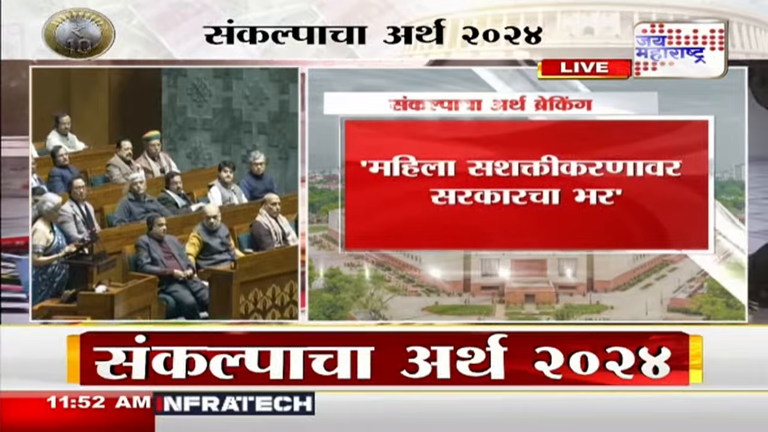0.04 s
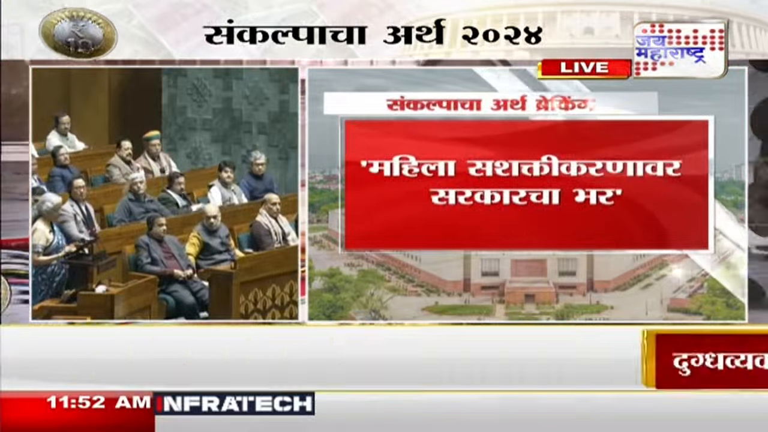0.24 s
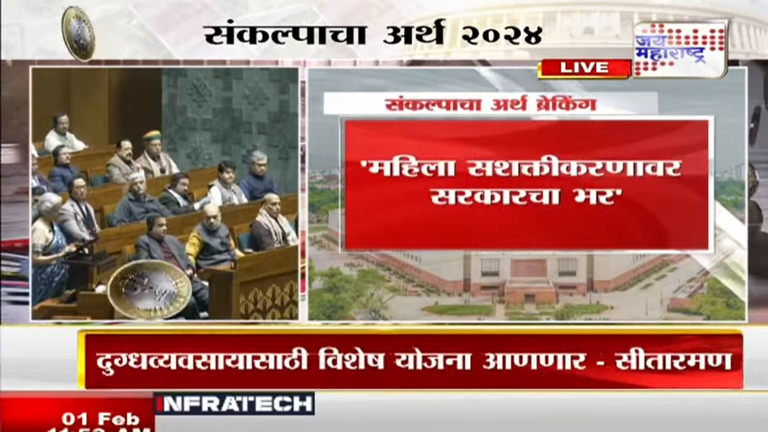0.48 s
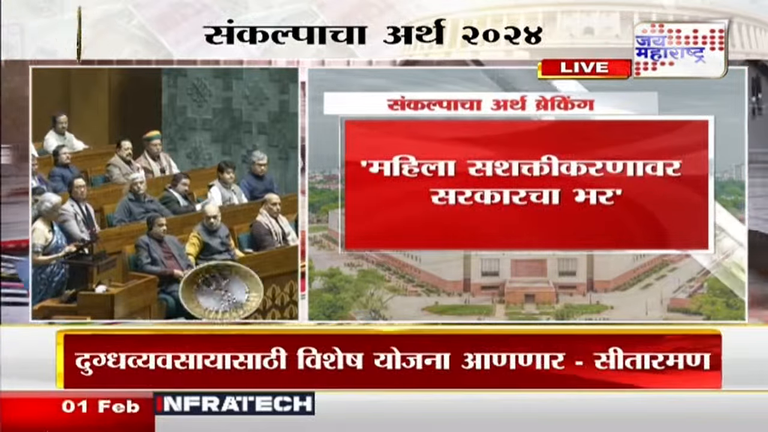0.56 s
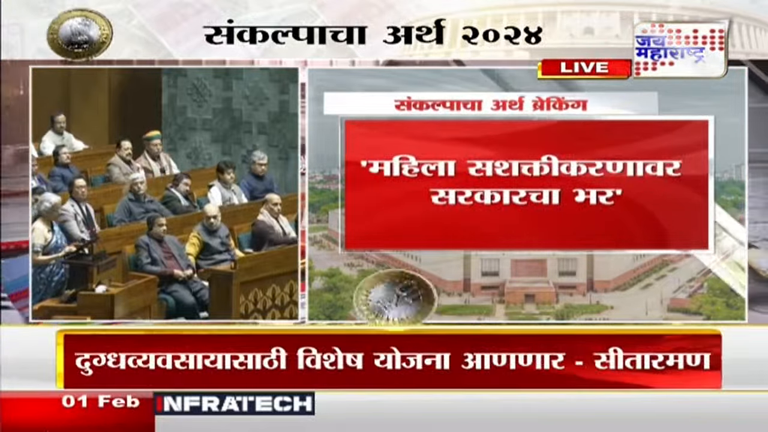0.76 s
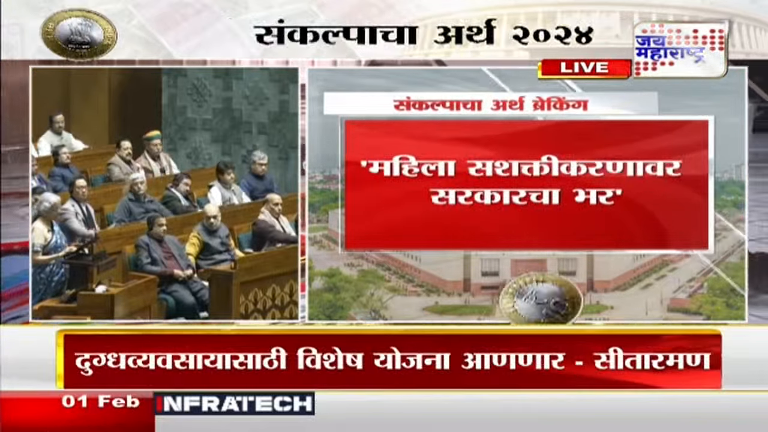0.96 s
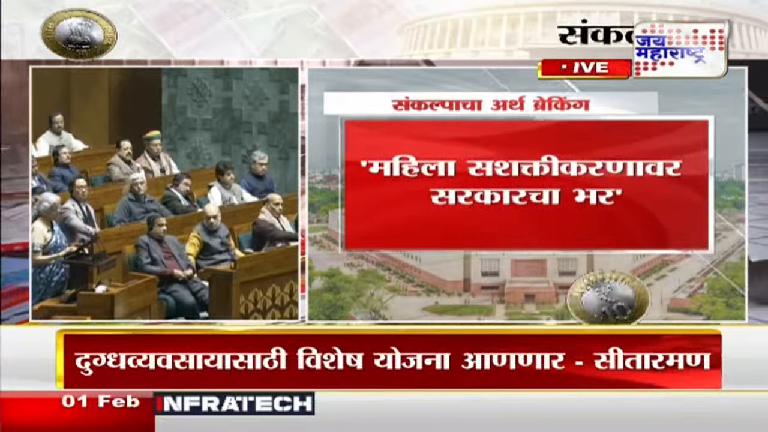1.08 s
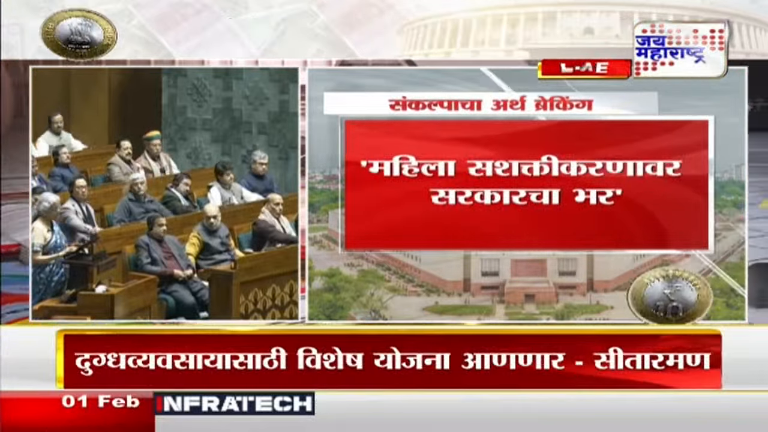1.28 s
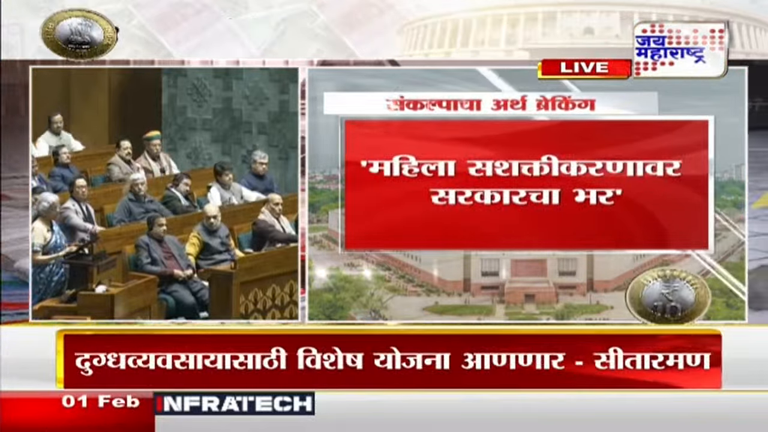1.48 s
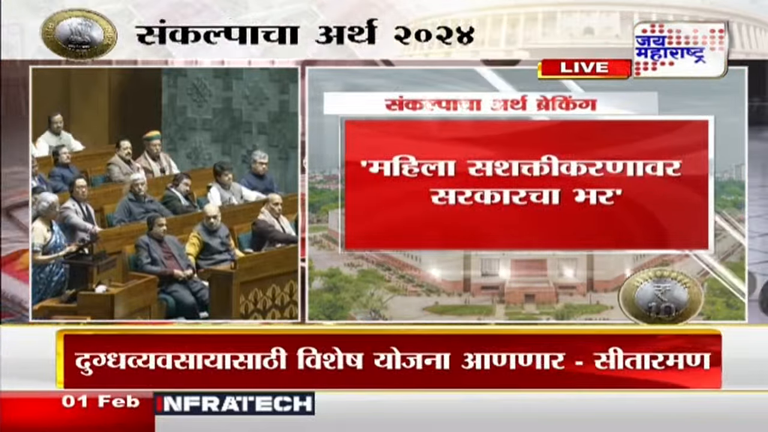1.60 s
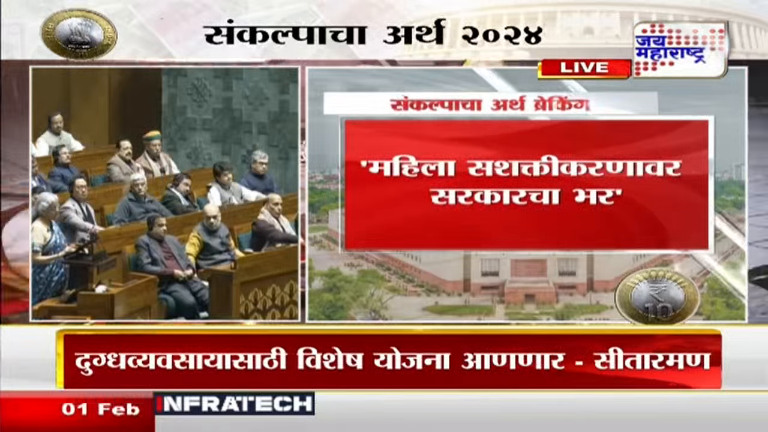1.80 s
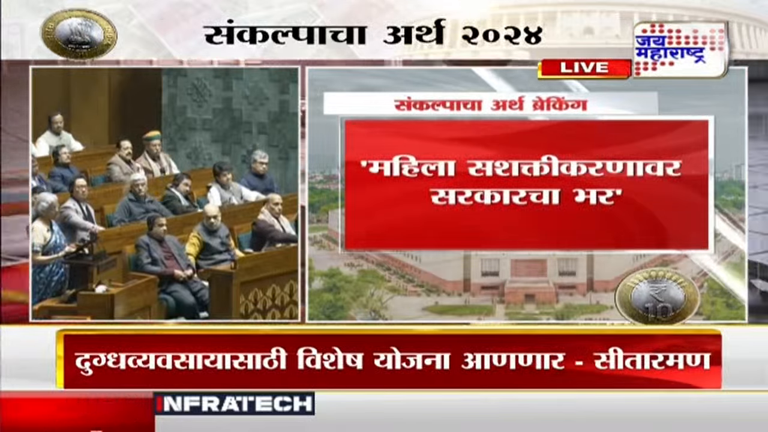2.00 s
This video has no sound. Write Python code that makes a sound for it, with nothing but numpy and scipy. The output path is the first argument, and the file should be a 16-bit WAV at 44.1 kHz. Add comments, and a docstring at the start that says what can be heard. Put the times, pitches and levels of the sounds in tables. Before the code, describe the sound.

Desk-thumping by a seated crowd in an assembly hall, dull booms, slaps and sharp wooden cracks

```python
"""Many hands thump wooden desks in a large assembly hall, a dense patter that swells.
Each crowd blow is a dull desk boom (fading sines) plus a slap of skin (a filtered burst of noise).
An echo made of fading noise blurs the far blows; light finger taps tick throughout.
Nearer slaps, some with ringing tones, and knocks stand out; twice something hard cracks on wood close by.
The level dips briefly once, and the microphone thins the deepest bass and the top."""
import sys
import numpy as np
from scipy import signal
from scipy.fft import rfft, irfft, next_fast_len
from scipy.io import wavfile
from scipy.ndimage import uniform_filter1d, map_coordinates

SR = 44100
rng = np.random.default_rng(int(sys.argv[2]) if len(sys.argv) > 2 else 0)


def wrap_up_sound(samples):
    """Save the sound to the file named by the first command line argument, as 16-bit audio."""
    columns = np.atleast_2d(samples).T
    # keep every value between -1 and 1, then stretch to whole-number steps
    tamed = np.clip(columns, -1, 1)
    steps = np.round(tamed * 32767).astype(np.int16)
    wavfile.write(sys.argv[1], SR, steps)


N = 90272  # length in samples, about two seconds
T = np.arange(SR // 4) / SR  # a quarter second of time, in seconds
# Throughout, t60 is the time in seconds a sound takes to fade by 60 dB.

# How loud the far slaps are over time. Each row: time in seconds, level in dB.
PATTER_LEVEL = [(0, -59.5), (.05, -56), (.14, -49.5), (.3, -50.5), (.43, -51), (.54, -54), (.64, -48.5),
                (.83, -48), (.93, -48.5), (1.05, -47.5), (1.18, -46), (1.27, -46.5), (1.39, -48),
                (1.52, -43.5), (1.66, -44), (1.78, -46), (1.92, -47), (2.04, -46)]


def amp(db):
    """Turn decibels into a gain."""
    return 10 ** (np.asarray(db) / 20)


def unit(x):
    """Scale to an average (rms) level of 1."""
    return x / np.sqrt(np.mean(x ** 2) + 1e-20)


def fade(t60, t=T):
    """Die away exponentially, as a struck thing loses its energy."""
    return np.exp(-np.log(1000) * t / t60)


def attack(rise_s, t=T):
    """Start softly: a gain that climbs from 0 towards 1."""
    return 1 - np.exp(-t / rise_s)


def along(points, hz):
    """Read a curve of (Hz, value) points, spaced by pitch (log frequency)."""
    point_hz, values = np.transpose(points)
    return np.interp(np.log(hz + 1), np.log(point_hz + 1), values)


def level(rows):
    """Turn a (seconds, dB) curve into one gain per sample."""
    return amp(np.interp(np.arange(N) / SR, *np.transpose(rows)))


def filtered(x, response):
    """Multiply each frequency of x by response(Hz)."""
    m = next_fast_len(2 * len(x))
    hz = np.fft.rfftfreq(m, 1 / SR)
    return irfft(rfft(x, m) * response(hz), m)[:len(x)]


def add(track, s, sound):
    """Mix a sound into the track at s seconds, cut off at the track's end."""
    i = max(round(s * SR), 0)
    part = track[i:i + len(sound)]
    part += sound[:len(part)]


def in_hall(x, wet):
    """Blend in the hall's echo, whose treble dies first; wet is its share of the power."""
    # How long the hall rings. Each row: frequency in Hz, t60 in seconds.
    hall_fade = [(100, 1.22), (1000, .9), (4000, 0.53), (12000, 0.31)]
    echo = np.zeros(len(x))
    # A fresh random echo every quarter second, so no single echo's tones stand out.
    for i in range(0, len(x), len(T)):
        hz, t, z = signal.stft(rng.standard_normal(SR), SR, nperseg=256)
        fading = z * fade(along(hall_fade, hz)[:, None], t)
        tail = signal.istft(fading, SR, nperseg=256)[1]
        tail = tail / np.linalg.norm(tail)
        add(echo, i / SR, signal.fftconvolve(x[i:i + len(T)], tail))
    wet = np.clip(wet, 0, 1)
    return np.sqrt(1 - wet) * x + np.sqrt(wet) * echo


def voiced(x, colour):
    """Flatten a layer's spectrum, give it a long-term colour, then hold its level steady at 1."""
    spectrum = rfft(x)
    power = abs(spectrum) ** 2
    smooth = abs(uniform_filter1d(power, size=150)) + 1e-9 * power.mean()
    tint = amp(along(colour, np.fft.rfftfreq(len(x), 1 / SR)))
    y = irfft(spectrum / np.sqrt(smooth) * tint, len(x))
    running_power = abs(uniform_filter1d(y ** 2, size=6000))
    return (y / np.sqrt(running_power + 1e-20))[-N:]


def wander(position):
    """Read a smooth random curve, with one random knot per unit of position, kept within -1 to 1."""
    knots = rng.standard_normal(size=64)
    return np.tanh(map_coordinates(knots, [position], mode="mirror"))


def grainy(count):
    """Flutter the gain as fingers and palm land one after another."""
    GRAIN_DB, GRAINS_PER_S = 5.5, 470
    return amp(GRAIN_DB * wander(np.arange(count) * GRAINS_PER_S / SR))


def slap(hz, octaves, t60):
    """Skin on wood: a short noise burst through one broad, uneven resonance."""
    RISE_S, SKIRT = 0.00076, 1.1  # a larger skirt falls off faster around the centre
    RIPPLE_DB, RIPPLE_HZ = 2.5, 675  # depth and spacing of each slap's own peaks and hollows
    t = T[:2048]
    shape = fade(t60, t) * attack(RISE_S, t) * grainy(len(t))

    def resonance(f):
        """One broad hump around hz, roughened by the ripple."""
        distance = np.log2((f + 1) / hz) / octaves
        return amp(RIPPLE_DB * wander(f / RIPPLE_HZ)) * (1 + distance ** 2) ** -SKIRT

    burst = filtered(rng.standard_normal(len(t)) * shape, resonance)
    return unit(burst) * np.sqrt(np.mean(fade(t60, t) ** 2))


def crowd():
    """Each hand beats its own desk at its own pace, waking its tones differently at every blow."""
    # The crowd's effort. Each row: time in seconds, level of the booms in dB.
    boom_level = [(0, -41.5), (.05, -51), (.14, -46), (.3, -48.5), (.42, -47), (.5, -45.5), (.64, -43.5),
                  (.8, -41.5), (.89, -43), (.96, -48.5), (1.08, -42.5), (1.2, -40), (1.37, -45),
                  (1.52, -38), (1.68, -41.5), (1.78, -41.5), (1.94, -41.5), (2.03, -45.5)]
    # Each row: time in seconds, gain of the deep bass against the other booms in dB.
    deep_level = [(0, 0), (.42, -0.5), (.52, 5.5), (.73, 2.5), (.82, -5), (.96, 5), (1.2, -3.5), (1.4, 0.5),
                  (1.7, 0.5), (2.04, 3)]
    # A middling desk top, before colouring. Each row: frequency in Hz, typical level in dB, t60 in seconds.
    desk_modes = [(78.4, 0.5, 0.063), (122, -2, 0.084), (196.7, 1.5, 0.045), (273.6, -0.5, 0.054),
                  (401.2, -3.5, 0.041), (542, -11.5, 0.027), (858, -13.5, 0.024)]
    # Long-term colours. Each row: frequency in Hz, relative level in dB per Hz.
    boom_colour = [(25, -7), (42, -18.5), (65, -7), (100, -6), (135, -3.5), (185, -1), (260, -3),
                   (400, -2.5), (560, -11), (800, -12.5), (1300, -43), (3000, -59)]
    patter_colour = [(200, -9), (500, 3), (850, 3.5), (1300, 4), (2200, 0), (3500, -1.5), (5500, -7),
                     (7000, -7), (9000, -10.5), (11000, -13.5), (13500, -14.5), (16000, -27)]
    HANDS, BLOWS_PER_S, TIMING_S = 38, 4.2, .025  # typical pace; timing scatter
    NEARNESS_DB, FORCE_DB = 2, 2  # scatter between hands, and between blows
    SLAP_HZ, SLAP_SCATTER_OCT, SLAP_T60_S, SLAP_SPREAD_DB = 4300, 0.69, 0.016, 13
    BOOM_WET, PATTER_WET = 0.46, 0.71  # the hall's share of the power
    DEEP_HZ = 115  # the deep bass lies below about this
    WASH_DB = -4.5  # the farthest slaps, fused into a hiss, against the nearer patter

    booms, slaps = np.zeros(N + SR), np.zeros(N + SR)
    mode_hz, mode_db, mode_t60 = np.transpose(desk_modes)
    for hand in range(HANDS):
        size, pace, near = rng.standard_normal(3)
        desk_hz = mode_hz * np.exp(0.2024 * size)
        desk = np.sin(2 * np.pi * np.outer(desk_hz, T)) * fade(mode_t60[:, None])
        beats = np.arange(rng.random(), 20) / (BLOWS_PER_S * np.exp(.15 * pace))
        for s, (late, force, flat, bright) in zip(beats, rng.standard_normal((20, 4))):
            s += TIMING_S * late
            spot = amp(mode_db) * rng.standard_normal(len(mode_hz))  # where the hand lands
            add(booms, s, amp(NEARNESS_DB * near + FORCE_DB * force) * spot @ desk)
            skin = slap(SLAP_HZ * 2 ** (SLAP_SCATTER_OCT * bright), 1.12, SLAP_T60_S)
            add(slaps, s, amp(SLAP_SPREAD_DB * np.tanh(flat)) * skin)

    wash = voiced(rng.standard_normal(N + SR), patter_colour)
    patter = voiced(in_hall(slaps, PATTER_WET), patter_colour) + amp(WASH_DB) * wash
    boom = voiced(in_hall(booms, BOOM_WET), boom_colour)
    deep = filtered(boom, lambda f: DEEP_HZ ** 4 / (f ** 4 + DEEP_HZ ** 4))
    balanced = boom - deep + level(deep_level) * deep
    return level(boom_level) * balanced + level(PATTER_LEVEL) * unit(patter)


def near_hands():
    """Single noisy slaps, their ringing tones and soft-edged two-tone knocks on the closest desks."""
    # Each row: start in seconds, level in dB, centre in Hz, spread in octaves, t60 in seconds.
    near_slaps = [(.0005, -36, 1920, 1.1, 0.021), (.112, -38.5, 3950, 1.5, 0.059),
                  (.121, -30, 3260, 1.8, 0.018), (0.201, -31, 11000, 2.3, 0.0042),
                  (.219, -33, 2370, 0.7, 0.0081), (.262, -33.5, 3650, 0.25, 0.015),
                  (.293, -38.5, 3030, 0.87, 0.021), (0.47, -33, 2670, 0.82, 0.022),
                  (0.469, -33, 9900, 1.1, 0.0093), (.494, -39.5, 3900, 2, 0.02),
                  (0.566, -37, 2090, 0.93, 0.026), (.59, -37, 3080, 1, 0.02),
                  (0.6228, -30, 4200, 1.6, 0.013), (0.631, -37, 2360, 1, 0.022),
                  (0.703, -26.5, 4530, 0.25, 0.0071), (0.7024, -29.5, 10400, 0.14, 0.0046),
                  (.774, -28.5, 3830, 0.47, 0.0044), (.803, -31, 2330, 1.1, 0.014),
                  (.849, -29.5, 2400, 1.06, 0.013), (.8495, -30, 7000, 0.78, 0.013),
                  (1.078, -33.5, 11100, 0.73, 0.011), (1.0987, -23, 9400, 0.18, 0.0063),
                  (1.0978, -32.5, 3930, 0.27, .009), (1.111, -34.5, 3900, 1.1, 0.013),
                  (1.117, -28, 9000, 0.2, 0.0051), (1.1343, -26.5, 6000, 2.3, 0.009),
                  (1.161, -30, 2780, 2.4, .02), (1.169, -36, 3480, 2.1, 0.029),
                  (1.180, -32.5, 2180, 1, 0.015), (1.302, -28.5, 11000, 1, 0.012),
                  (1.326, -35, 1900, 0.67, 0.015), (1.442, -37, 8000, 0.4, 0.0087),
                  (1.49, -38, 4040, 1.4, 0.0079), (1.495, -40.5, 8100, 0.24, .012),
                  (1.522, -39.5, 9100, 0.19, 0.03), (1.497, -36, 3480, 1, 0.024),
                  (1.518, -30.5, 4600, 2, 0.0063), (1.528, -27, 5600, 1.7, 0.0044),
                  (1.7261, -31.5, 7840, 2.1, 0.025), (1.753, -25, 4900, 2.8, 0.0076),
                  (1.825, -33, 8500, 0.45, 0.0074), (1.9897, -37.5, 5530, 0.98, 0.016)]
    # Ringing tones of the near slaps, some hollow like a cupped clap.
    # Each row: start in seconds, level in dB, pitch in Hz, t60 in seconds.
    slap_tones = [(.122, -29, 870, 0.037), (.47, -28.5, 893, 0.032), (.4705, -30, 2630, 0.013),
                  (.47, -18, 13200, .004), (.7012, -19.5, 4000, 0.0082), (.7012, -22, 5240, 0.0084),
                  (1.0988, -21.5, 5540, .01), (1.0988, -26, 4720, 0.011), (1.162, -34, 8050, .022),
                  (1.189, -37, 13350, .03), (1.728, -28, 5470, .014), (1.7275, -26.5, 8000, 0.012),
                  (1.7518, -26, 8860, .008), (2.033, -28.5, 807, 0.011)]
    # Each row: start in seconds, level in dB, desk pitch in Hz, t60 in seconds.
    near_knocks = [(.001, -28.5, 259, 0.024), (.127, -33, 247, 0.064), (.14, -37.5, 163, 0.19),
                   (.472, -30, 406, 0.041), (.478, -37, 166, 0.082), (.52, -36.5, 252, 0.094),
                   (0.588, -28.5, 298, 0.028), (.685, -35.5, 451, 0.1), (0.717, -31.5, 117, 0.074),
                   (.778, -30.5, 190.4, 0.27), (.792, -38, 392, 0.069), (0.844, -33.5, 201, 0.14),
                   (0.877, -31.5, 252, 0.086), (.975, -38, 154, .17), (1.044, -32.5, 262.6, 0.11),
                   (1.156, -35, 323, 0.19), (1.157, -31, 136, 0.15), (1.164, -30.5, 497, .05),
                   (1.182, -21, 188, 0.021), (1.21, -24.5, 155, 0.02), (1.271, -25.5, 346, 0.042),
                   (1.304, -29, 226, 0.074), (1.327, -28.5, 275, .05), (1.422, -28.5, 284, 0.073),
                   (1.426, -32.5, 198, 0.2), (1.469, -29.5, 177, 0.12), (1.504, -39, 199, 0.1),
                   (1.527, -27.5, 255, 0.11), (1.572, -34, 295, 0.092), (1.607, -37.5, 222, 0.096),
                   (1.609, -33, 401, 0.07), (1.753, -28, 400, 0.026), (1.762, -20, 257, 0.043),
                   (1.772, -28, 175.6, .15), (1.846, -31, 174, 0.11), (1.8825, -20.5, 394, 0.03),
                   (1.899, -30, 274.4, .15), (1.945, -33, 333, 0.14), (2.033, -23.5, 417, 0.02)]
    TONE_RISE_S, KNOCK_RISE_S = 0.00063, 0.0012
    OVERTONE_RATIO, OVERTONE_DB = 1.629, -11  # pitch and level against the knock's main tone
    KNOCK_LOW_HZ = 112  # knocks are thinned below about this
    NEAR_WET = 0.059  # the hall's share of the power

    slaps, knocks = np.zeros(N), np.zeros(N)
    for s, db, hz, octaves, t60 in near_slaps:
        add(slaps, s, amp(db) * slap(hz, octaves, t60))
    for s, db, hz, t60 in slap_tones:
        ring = np.sin(2 * np.pi * hz * T)
        add(slaps, s, amp(db) * ring * fade(t60) * attack(TONE_RISE_S))
    for s, db, hz, t60 in near_knocks:
        turn = 2 * np.pi * hz * T
        ring = np.sin(turn) + amp(OVERTONE_DB) * np.sin(OVERTONE_RATIO * turn)
        add(knocks, s, amp(db) * ring * fade(t60) * attack(KNOCK_RISE_S))
    thinned = filtered(knocks, lambda f: f ** 4 / (f ** 4 + KNOCK_LOW_HZ ** 4))
    return in_hall(slaps + thinned, NEAR_WET)


def taps():
    """Fingers tick lightly at random moments: narrow slaps, each at its own pitch."""
    TAPS, TAP_DB, FORCE_DB = 110, -1, 3  # count; level against the patter curve; its scatter
    TAP_HZ, SCATTER_OCT, TAP_T60_S = 4150, 0.82, 0.016
    out = np.zeros(N)
    for _ in range(TAPS):
        force, bright = rng.standard_normal(2)
        tick = slap(TAP_HZ * 2 ** (SCATTER_OCT * bright), 0.24, TAP_T60_S)
        add(out, rng.random() * N / SR, amp(TAP_DB + FORCE_DB * np.tanh(force)) * tick)
    return level(PATTER_LEVEL) * out


def cracks():
    """A hard contact snaps, rings for a few milliseconds and rebounds once."""
    # Each row: start in seconds, level in dB, then its snap and its rebound in dB against that level.
    hard_cracks = [(1.4223, -15.5, -10, -8), (2.033, -18, -0.5, -2.5)]
    # What a crack rings with. Each row: frequency in Hz, typical level in dB, t60 in seconds.
    crack_modes = [(825, -11.5, 0.01), (1780, -7, 0.017), (2350, -1, 0.0087), (2970, 4, 0.011),
                   (3350, -8.5, 0.006), (4720, -15.5, 0.015), (5530, -13, 0.014), (7850, -4, 0.0097),
                   (10600, -8, 0.011)]
    RISE_S, SCATTER_DB, SNAP_T60_S, REBOUND_S = 0.0004, 1, 0.0087, 0.0035
    out = np.zeros(N)
    for s, db, snap_db, rebound_db in hard_cracks:
        ring = np.zeros(len(T))
        for k, (hz, mode_db, t60) in enumerate(crack_modes):
            gain = amp(mode_db + SCATTER_DB * rng.standard_normal())
            ring += (-1) ** k * gain * np.sin(2 * np.pi * hz * T) * fade(t60)  # signs alternate
        add(out, s, amp(db) * ring * attack(RISE_S))
        add(out, s, amp(db + snap_db) * slap(5700, 1.45, SNAP_T60_S))
        add(out, s + REBOUND_S, amp(db + rebound_db) * slap(10500, 0.59, 0.0022))
    return in_hall(out, 0.003)


def scene():
    """Add up the whole hall as heard at one point."""
    return (crowd() + near_hands() + taps() + cracks())[None]


def record(dry):
    """The level dips for an instant; the microphone colours the sound and cuts the very top."""
    # The microphone's colour. Each row: frequency in Hz, gain in dB.
    mic_colour = [(20, -11), (40, -10), (62, 1.5), (6000, 0), (6800, -4.5), (7700, -0.5), (11000, -0.5),
                  (12200, -5.5), (13400, -4.5), (15000, -6), (16200, -16)]
    DIP_S, DIP_LENGTH_S, DIP_DB = 1.5665, 0.012, -17.5  # middle, length and depth
    TOP_HZ = 16200
    dip = np.exp(-((np.arange(N) / SR - DIP_S) / (DIP_LENGTH_S / 2)) ** 4)
    dipped = dry[0] * amp(DIP_DB * dip)
    return filtered(dipped, lambda hz: amp(along(mic_colour, hz)) * (hz < TOP_HZ))[None]


dry = scene()
out = record(dry)
wrap_up_sound(out)
```